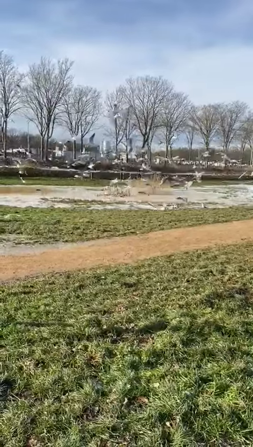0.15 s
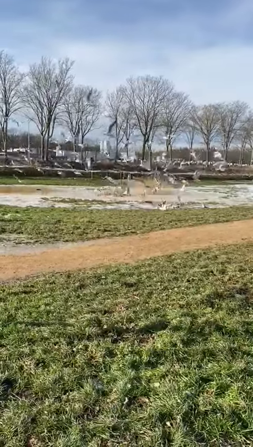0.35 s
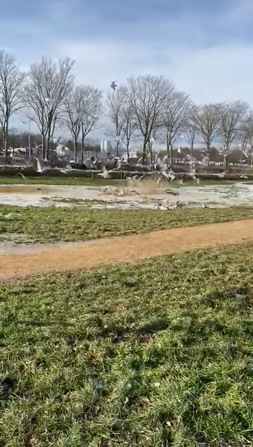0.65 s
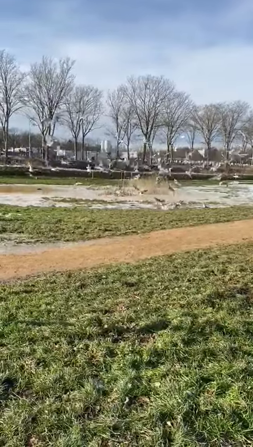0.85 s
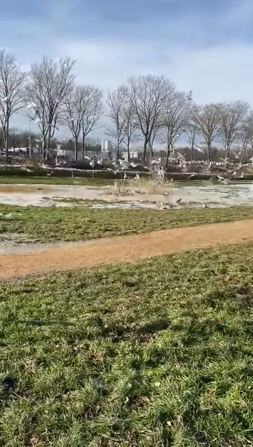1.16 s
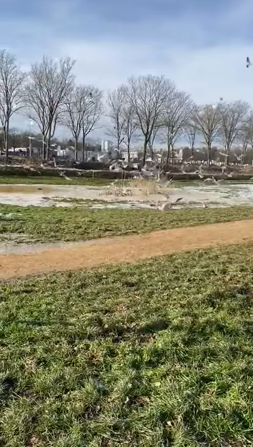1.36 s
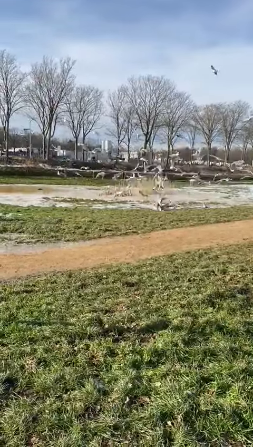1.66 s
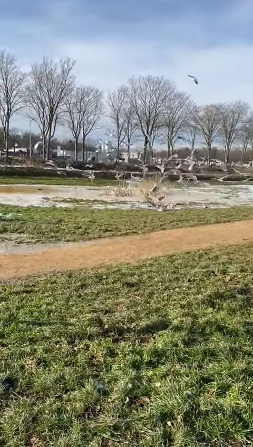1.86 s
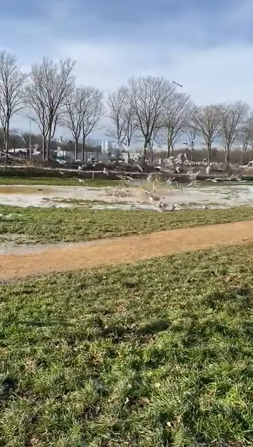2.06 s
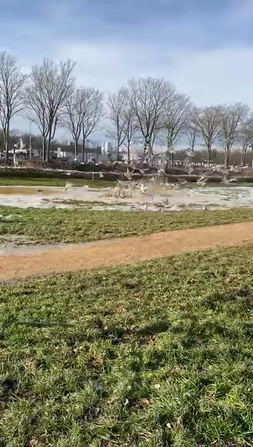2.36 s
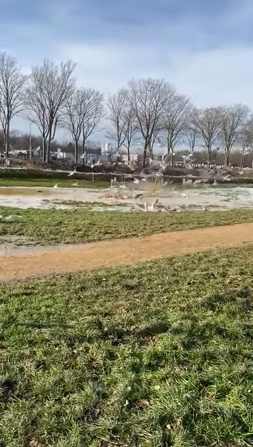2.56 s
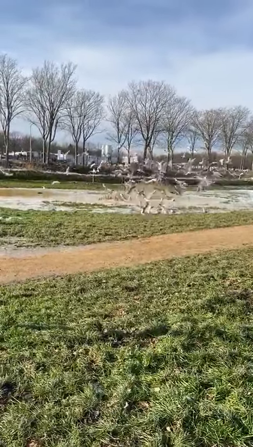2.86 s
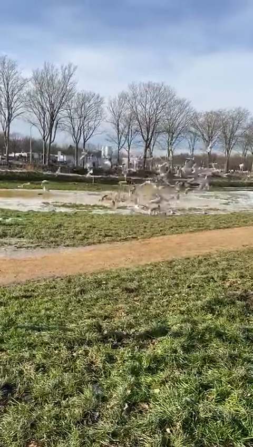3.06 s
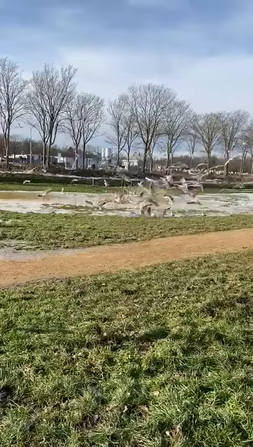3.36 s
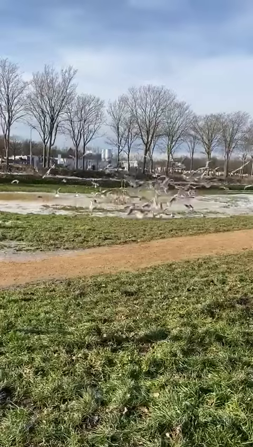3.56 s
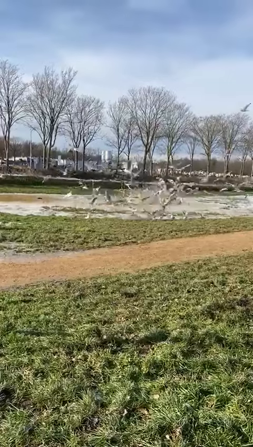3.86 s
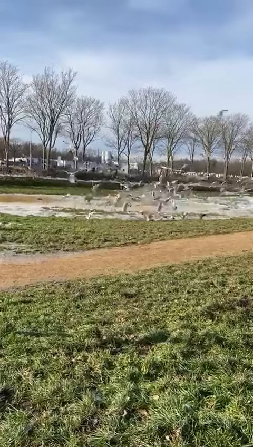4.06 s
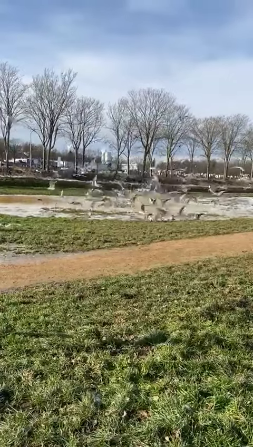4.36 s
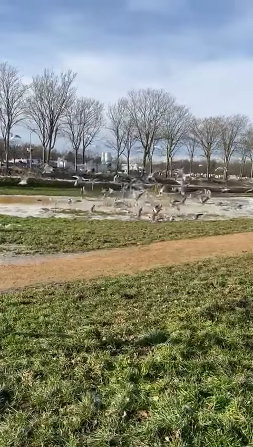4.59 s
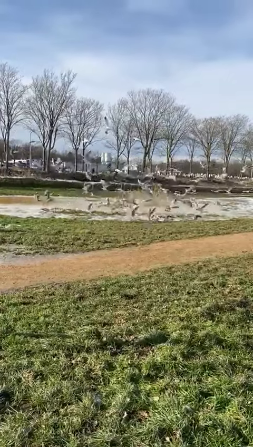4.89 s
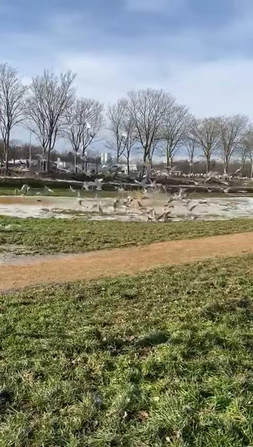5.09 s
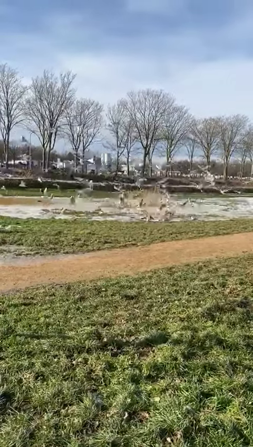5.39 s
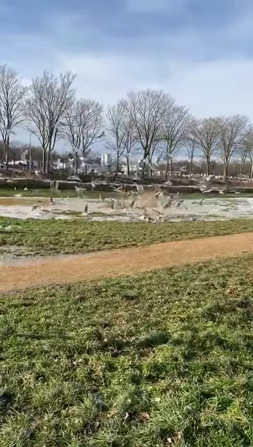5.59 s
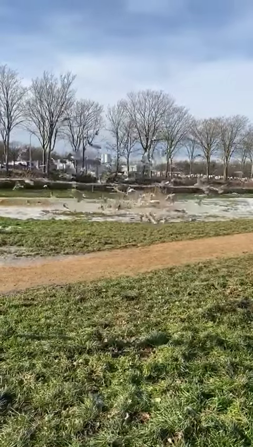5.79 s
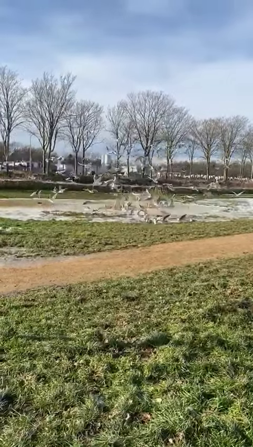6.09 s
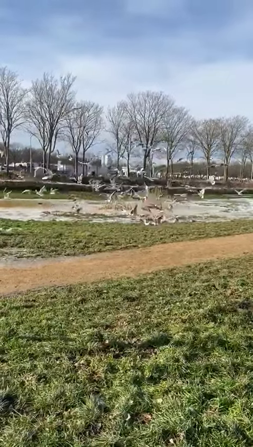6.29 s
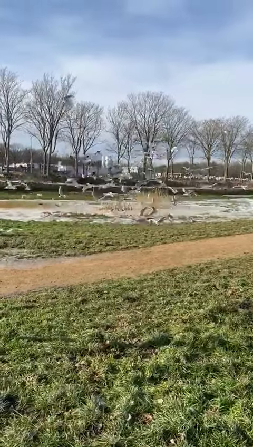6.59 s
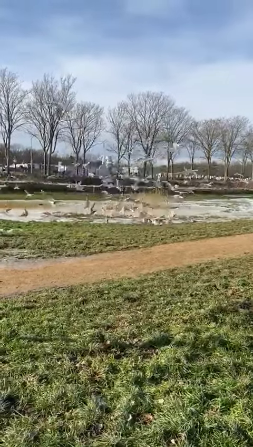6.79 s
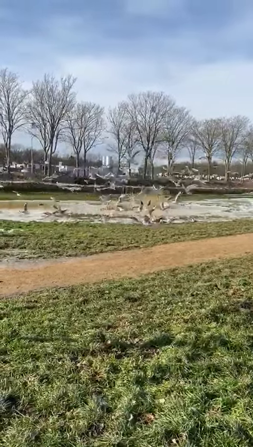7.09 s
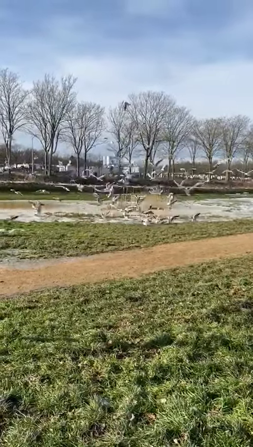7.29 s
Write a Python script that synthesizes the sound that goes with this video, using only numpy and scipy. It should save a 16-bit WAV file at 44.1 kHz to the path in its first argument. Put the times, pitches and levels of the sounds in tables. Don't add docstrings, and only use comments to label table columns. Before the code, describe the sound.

A large flock of gulls squabbles over a flooded open field, about forty metres from a hand-held stereo phone. From 0 to 2 s the cries are scattered and quieter after a brief far chorus at the start: short nasal yelps and rasps around 1 kHz, quickly throbbing, with light thumps on the case. From 2 s the flock grows louder; a knock near 2.5 s is firm. At 3.1 s two clear, steady calls stand out over a surge of distant birds. Between 3.4 and 6.4 s harsh overlapping cries are almost continuous, pitches sliding and clashing; the heaviest low thump lands at 3.75 s, with others until about 5.3 s. The clamour continues to 7.4 s, slightly looser, with faint final knocks after 7 s. Soft wind rumbles, distant traffic hisses, and a low engine hum rises weakly after 6.3 s. Echo is slight.

```python
import sys
import numpy as np
from scipy import signal
from scipy.fft import rfft, irfft
from scipy.io import wavfile
from scipy.ndimage import uniform_filter1d

SR = 44100
rng = np.random.default_rng(int(sys.argv[2]) if len(sys.argv) > 2 else 0)


def pcm_store(signal):
    levels = np.round(np.clip(np.atleast_2d(signal), -1, 1) * 32767)
    wavfile.write(sys.argv[1], SR, levels.astype(np.int16).T)


def attenuation_scalar(level_db):
    decades = np.asarray(level_db, float) / 20
    return 10 ** decades


N = 328104
TIME_S = np.arange(N) / SR


def shape(points, hz, column=1):
    table = np.array(points, float)
    return np.interp(np.log(np.maximum(hz, 1)), np.log(table[:, 0]), table[:, column])


def curve(points, column=1):
    table = np.array(points, float)
    return np.interp(TIME_S, table[:, 0], table[:, column])


def unit(x):
    return x / np.sqrt(np.mean(x ** 2) + 1e-18)


def walk(size, rate_hz):
    width = max(int(SR / rate_hz), 2)
    noise = rng.standard_normal(max(size, SR // 3), dtype=np.float32)[:size]
    return unit(uniform_filter1d(uniform_filter1d(noise, width), width))


def flicker(rate_hz):
    coarse = walk(N // 8, 8 * rate_hz)
    return np.interp(TIME_S, np.linspace(0, N / SR, N // 8), coarse)


def tinted(points):
    hz = np.fft.rfftfreq(N, 1 / SR)
    return unit(irfft(rfft(rng.standard_normal(N)) * attenuation_scalar(shape(points, hz)), N))


def partials(hz, colour, tilt_db=0, scatter_db=2):
    partial_hz = hz * np.arange(1, 13)
    weak_db = 13 * (partial_hz == hz)
    tilt = tilt_db * np.log2(partial_hz / 3500)
    return shape(colour, partial_hz) - weak_db + tilt + scatter_db * rng.standard_normal(12)


def voice(size, hz, throb_hz, harsh, partial_db, effort, glide=0, lead=0,
          arch=.05, bow=.07, wobble=.06, depth=1):
    beat = lead + np.cumsum(throb_hz * (1 + .15 * harsh * walk(size, 25))) / SR
    swell = np.sin(np.pi * beat) ** 2
    along = np.linspace(-1, 1, size)
    shake = harsh * (wobble * walk(size, 40) + .2 * harsh * walk(size, 900))
    pitch_hz = hz * (1 + glide * along + bow * (1 / 3 - along ** 2) + arch * (swell - .6) + shake)
    phase = np.float32(2 * np.pi * np.cumsum(pitch_hz) / SR)
    order = np.arange(1, len(partial_db) + 1, dtype=np.float32)[:, None]
    strength = np.float32(effort) ** (0.54 + 0.092 * order)
    stack = attenuation_scalar(partial_db) @ (strength * np.cos(order * phase))
    gate = 1 - depth * (1 - .25 * harsh) * (1 - np.tanh(2.4 * swell ** 2.2))
    return unit(stack * gate)


# start_s, length_s, pitch_hz, throb_hz, level_db
STEADY_CRIES = [
    (3.068, .08, 1095, 50, -32.5),
    (3.168, .105, 1090, 50, -30.5),
    (3.9, .04, 1060, 64, -37),
    (3.99, .03, 1075, 64, -36),
]
# start_s, length_s, pitch_hz, throb_hz, level_db
CLEAR_CRIES = [(0.194, 0.026, 958, 58, -42), (0.449, 0.057, 982, 83, -36.5),
               (0.704, 0.0064, 1060, 90, -49.5), (0.755, 0.062, 945, 62, -44.5),
               (0.914, 0.021, 1030, 60, -40.5), (2.157, 0.044, 955, 56, -43.5),
               (1.175, 0.032, 1180, 96, -43), (1.725, 0.02, 1024, 62, -43), (2.436, 0.1, 1010, 99, -31),
               (2.888, 0.033, 1022, 47, -33.5), (3.813, 0.081, 1044, 64, -36), (7.182, 0.1, 956, 51, -35),
               (7.256, 0.074, 1225, 61, -32.5), (7.381, 0.061, 982, 88, -40.5)]
# start_s, length_s, pitch_hz, throb_hz, level_db
RASPING_CRIES = [(0.111, 0.14, 1400, 110, -67), (1.017, 0.083, 823, 50, -57), (1.298, 0.092, 860, 62, -42),
                 (1.641, 0.046, 866, 34.5, -36.5), (1.77, 0.051, 1010, 96, -43.5),
                 (1.956, 0.062, 933, 55, -34), (2.221, 0.1, 992, 71, -34), (3.447, 0.066, 1023, 110, -33),
                 (3.496, 0.15, 1027, 45, -34.5), (3.701, 0.093, 1303, 58, -28),
                 (3.856, 0.15, 1040, 89, -34), (4.108, 0.12, 1047, 100, -32.5),
                 (4.814, 0.17, 1156, 64, -30), (5.219, 0.11, 1123, 65, -31.5),
                 (5.532, 0.19, 1188, 108, -31.5), (5.727, 0.16, 1024, 88, -31),
                 (5.912, 0.078, 783, 70, -44), (6.17, 0.115, 820, 61, -34), (2.842, 0.059, 1030, 60, -35),
                 (3.28, 0.11, 1040, 76, -33.5), (0.869, 0.071, 1000, 63, -54)]
# start_s, length_s, pitch_hz, level_db
SQUABBLE_CRIES = [(0.0, 0.053, 853, -54), (0.252, 0.092, 1040, -55.5), (0.613, 0.034, 1015, -54),
                  (1.211, 0.085, 877, -46.5), (1.45, 0.2, 985, -42), (1.861, 0.1, 1180, -38.5),
                  (2.074, 0.097, 882, -36), (2.312, 0.095, 917, -33.5), (2.516, 0.12, 1020, -41.5),
                  (2.632, 0.18, 1137, -34), (2.926, 0.15, 1176, -31.5), (3.973, 0.14, 1157, -32),
                  (4.204, 0.1, 1030, -31), (4.302, 0.17, 1116, -34.5), (4.487, 0.17, 959, -31.5),
                  (4.624, 0.081, 993, -33.5), (4.707, 0.12, 1128, -36.5), (5.005, 0.15, 1020, -34.5),
                  (5.346, 0.19, 907, -33.5), (5.994, 0.15, 992, -29), (6.362, 0.14, 945, -31),
                  (6.545, 0.14, 1042, -37), (6.682, 0.093, 1080, -37.5), (6.836, 0.17, 893, -37),
                  (7.039, 0.14, 882, -35.5), (0.041, 0.046, 975, -41.5), (2.39, 0.044, 1014, -48),
                  (2.784, 0.074, 1050, -42), (3.601, 0.11, 1050, -45), (5.159, 0.082, 1060, -42.5),
                  (6.491, 0.06, 1000, -46.5), (7.318, 0.044, 995, -47), (1.106, 0.059, 1050, -54),
                  (1.392, 0.16, 1010, -54), (2.022, 0.063, 985, -60), (3.38, 0.056, 1016, -49),
                  (4.444, 0.059, 1050, -38), (5.315, 0.053, 1000, -49), (6.989, 0.05, 967, -51)]
STEADY_HARSH, CLEAR_HARSH, RASP_HARSH, SQUABBLE_HARSH = .12, .27, .47, .75


def roster():
    steady = [(*cry, STEADY_HARSH) for cry in STEADY_CRIES]
    clear = [(*cry, CLEAR_HARSH) for cry in CLEAR_CRIES]
    rasps = [(*cry, RASP_HARSH) for cry in RASPING_CRIES]
    squabbles = [(s, length_s, hz, 70, db, SQUABBLE_HARSH) for s, length_s, hz, db in SQUABBLE_CRIES]
    return steady + clear + rasps + squabbles


# time_s, chorus_db, beak_tilt_db_per_octave
FLOCK_COURSE = [(0.0, -34, -7), (0.4, -49.5, 1.5), (0.9, -50.5, 1.5), (1.1, -47.5, 3.5), (2.1, -38.5, 2.5),
                (2.6, -34, 0.5), (3.0, -35.5, 0.5), (3.2, -27, -4), (3.35, -34, 0), (3.5, -33, 2),
                (5.7, -34.5, 1.5), (6.4, -34, 1.5), (7.44, -33.5, 0.5)]
# freq_hz, level_db
THROAT_COLOUR = [(800, 10.5), (1200, -2.5), (1800, 0), (2100, -13), (2600, 13), (3200, 6), (4300, 0.5),
                 (5400, -6.5), (6500, -14.5), (7600, -13.5), (8500, -19), (11300, -25.5)]
# freq_hz, level_db
STEADY_COLOUR = [(900, -6), (2200, 0), (3300, -7), (4400, 0), (5500, -6), (6600, -9), (7700, -14),
                 (8800, -20), (11300, -26)]


def cries(spill_s=.03, edge=.75, bow_s=.00719, join_db=-1):
    out = np.zeros(N + SR)
    tilt = curve(FLOCK_COURSE, column=2)
    for s, length_s, hz, throb_hz, db, harsh in roster():
        start = max(int((s - spill_s / 2) * SR), 0)
        size = int((length_s + spill_s) * SR)
        tilt_db = tilt[min(start + size // 2, N - 1)]
        effort = signal.windows.tukey(size, (edge * harsh + 0.48) * min(0.11 / length_s, 1))
        if harsh <= STEADY_HARSH:
            levels_db, bow = partials(hz, STEADY_COLOUR), .025
        else:
            levels_db = partials(hz, THROAT_COLOUR, tilt_db)
            bow = min(bow_s / (length_s + spill_s), .1)
        cry = voice(size, hz, throb_hz, harsh, levels_db, effort, bow=bow)
        # pitch_hz, throb_hz, glide, crest (0-1 of the cry)
        neighbours = rng.uniform([850, 45.5, -.1, .1], [1200, 120, .1, 0.84], size=(3, 4))
        for near_hz, near_throb_hz, glide, crest in neighbours:
            own = effort * np.exp(-((np.linspace(0, 1, size) - crest) / 0.5) ** 2)
            levels_db = partials(near_hz, THROAT_COLOUR, tilt_db, scatter_db=6)
            joined = voice(size, near_hz, near_throb_hz, .45, levels_db, own, glide)
            cry += harsh ** 1.5 * attenuation_scalar(join_db) * joined
        out[start:start + size] += attenuation_scalar(db - 1.0) * unit(cry)
    return out[:N]


# start_s, length_s, first_hz, last_hz, level_db
LIFTED_PARTIALS = [(0.0, 0.063, 1870, 1777, -41), (0.108, 0.12, 1367, 1725, -45.5),
                   (0.31, 0.025, 1617, 1710, -42), (0.458, 0.098, 1890, 1710, -42),
                   (0.74, 0.083, 1840, 1840, -43), (0.86, 0.056, 1560, 1774, -49),
                   (1.156, 0.1, 1194, 1697, -48), (1.305, 0.087, 1870, 1660, -46.5),
                   (1.574, 0.08, 1800, 1960, -42), (1.035, 0.065, 1510, 1860, -49),
                   (1.105, 0.05, 2055, 2360, -49), (1.516, 0.041, 1896, 2000, -47),
                   (2.0, 0.038, 1737, 1780, -40), (2.161, 0.22, 1914, 1960, -44.5),
                   (2.418, 0.12, 1925, 2065, -36.5), (3.92, 0.08, 1750, 1700, -42),
                   (2.948, 0.08, 2050, 1900, -38), (3.289, 0.14, 1783, 1720, -44.5),
                   (0.687, 0.028, 2140, 2080, -51), (3.596, 0.1, 1800, 1705, -41.5),
                   (5.6, 0.11, 1750, 1636, -47), (6.371, 0.097, 1950, 2030, -43),
                   (6.59, 0.067, 1950, 2140, -43), (6.18, 0.091, 1650, 1720, -46),
                   (3.45, 0.15, 1900, 2090, -36.5), (3.693, 0.1, 1912, 1820, -38),
                   (3.759, 0.18, 2137, 2020, -37), (4.009, 0.13, 2074, 1690, -35.5),
                   (4.179, 0.066, 2150, 2056, -36), (5.092, 0.15, 2200, 2014, -40.5),
                   (5.235, 0.079, 2053, 2450, -38), (5.415, 0.096, 1900, 1714, -37),
                   (5.729, 0.13, 1798, 2145, -35), (5.988, 0.18, 2120, 1760, -37),
                   (6.701, 0.052, 2133, 2110, -35), (6.872, 0.2, 1720, 1870, -43),
                   (0.181, 0.08, 2810, 3040, -39.5), (1.212, 0.043, 2660, 2620, -38),
                  (1.655, 0.032, 2700, 2830, -32), (1.986, 0.099, 2830, 2910, -50),
                  (3.501, 0.086, 3150, 3220, -33), (3.802, 0.027, 2200, 2400, -72),
                  (3.896, 0.072, 3055, 3130, -29), (3.978, 0.058, 3200, 3140, -32.5),
                  (4.119, 0.055, 3160, 3200, -38), (4.283, 0.074, 3080, 2970, -34),
                  (4.75, 0.046, 3130, 2920, -33), (5.043, 0.063, 2480, 2590, -32.5),
                  (5.636, 0.048, 3290, 2920, -33), (6.012, 0.069, 3090, 2620, -31),
                  (6.215, 0.085, 2270, 2593, -34.5), (6.248, 0.045, 2980, 3230, -34),
                  (6.428, 0.092, 2620, 2330, -39), (6.802, 0.075, 1290, 1840, -46),
                  (7.067, 0.086, 2350, 2830, -37), (7.122, 0.046, 3050, 3030, -34.5),
                  (7.228, 0.081, 2200, 2610, -41.5), (7.373, 0.074, 3070, 3140, -37),
                   (2.099, 0.071, 3480, 3440, -35.5), (2.6, 0.084, 3850, 3600, -38),
                 (2.4, 0.15, 4400, 2400, -35), (2.1, 0.07, 3600, 3400, -43), (4.19, 0.07, 3900, 4200, -41),
                 (3.452, 0.0386, 3600, 4350, -35.5), (4.83, 0.04, 3000, 4280, -38),
                 (0.757, 0.052, 4650, 5500, -49), (5.8, 0.031, 4250, 3000, -42),
                 (5.8, 0.07, 3900, 4300, -38.5), (2.5, 0.022, 5900, 7040, -41),
                 (3.6, 0.055, 7000, 6850, -51), (4.6, 0.097, 4500, 4410, -42), (7.2, 0.07, 4100, 4680, -39),
                 (6.036, 0.076, 4150, 3780, -44), (8, 0.1, 2700, 2800, -43),
                 (7.198, 0.068, 4000, 4010, -41), (8.3, 0.045, 3750, 3890, -38),
                 (0.465, 0.021, 4050, 3950, -40), (3.745, 0.055, 4200, 4250, -35),
                 (3.8, 0.085, 4200, 4330, -33), (3.6, 0.035, 4310, 4480, -34.5),
                 (6.7, 0.093, 4200, 3200, -33), (4.119, 0.066, 2100, 5200, -37),
                 (0.539, 0.077, 1780, 1600, -44.5), (4.722, 0.097, 3710, 4200, -38),
                 (4.863, 0.099, 3800, 4200, -33.5), (5.568, 0.0326, 4740, 6700, -37.5),
                 (5.613, 0.051, 3900, 5200, -37.5), (6.3, 0.044, 2900, 4190, -36),
                 (7.201, 0.14, 4300, 5170, -39)]


def strands(beak_db=12, harsh=.2):
    out = np.zeros(N + SR)
    nearer = roster()
    for s, length_s, first_hz, last_hz, db in LIFTED_PARTIALS:
        middle_s = s + length_s / 2
        parent = min(nearer, key=lambda cry: abs(cry[0] + cry[1] / 2 - middle_s))
        began_s, _, hz, throb_hz = parent[:4]
        start, size = max(int(s * SR), 0), int(length_s * SR)
        centre_hz = (first_hz + last_hz) / 2
        order = max(round(centre_hz / hz), 1)
        levels_db = partials(centre_hz / order, THROAT_COLOUR)
        levels_db[order - 1] = levels_db.max() + beak_db
        effort = signal.windows.tukey(size, .6)
        glide = (last_hz - first_hz) / centre_hz / 2
        lead = throb_hz * (s - began_s + 0.01503)
        strand = voice(size, centre_hz / order, throb_hz, harsh, levels_db, effort, glide, lead,
                       bow=.055, wobble=.07, depth=.75)
        out[start:start + size] += attenuation_scalar(db) * strand
    return out[:N]


# freq_hz, level_db
FAR_COLOUR = [(900, -26), (1400, -6), (1700, 0), (2100, -2), (2600, -9), (4200, -7), (5500, -13),
              (8500, -24), (11300, -29)]


def chorus(count=170, length_s=.13, blur_db=-5):
    out = np.zeros(N + SR)
    size = int(length_s * SR)
    draws = rng.uniform([0, 790, 46, 1.5, -.1], [1, 1200, 120, 2.2, 0.3], size=(count, 5))
    for place, hz, throb_hz, db, glide in draws:
        start = int(place * N)
        cry = voice(size, hz, throb_hz, .45, partials(hz, FAR_COLOUR), np.hanning(size), glide)
        out[start:start + size] += attenuation_scalar(db) * cry
    blend = unit(out[:N]) + attenuation_scalar(blur_db) * tinted(FAR_COLOUR)
    return attenuation_scalar(curve(FLOCK_COURSE) - 2.5) * blend


def answer(near, quick_s=.02, mood_s=.8, closeness=.49):
    quick = uniform_filter1d(near ** 2, int(quick_s * SR)) + 1e-9
    slow = uniform_filter1d(near ** 2, int(mood_s * SR)) + 1e-9
    return (quick / slow) ** (closeness / 2)


def field(x, ground_s=.0021, ground_db=-14, trees_db=-23, t60_s=.3):
    age_s = np.arange(SR // 2) / SR
    tail = rng.standard_normal(len(age_s)) * np.exp(-np.log(1000) * age_s / t60_s)
    response = attenuation_scalar(trees_db) * tail / np.sqrt(SR * t60_s / 14)
    response[0] += 1
    response[int(ground_s * SR)] += attenuation_scalar(ground_db)
    return signal.fftconvolve(x, response)[:N]


# start_s, peak_db
CASE_THUMPS = [(0.426, -21.5), (0.409, -30), (0.651, -20.5), (0.674, -28.5), (.704, -25), (.722, -25.5),
               (1.04, -27.5), (1.074, -25.5), (1.091, -27), (1.143, -29), (1.158, -30), (1.457, -17),
               (1.491, -22), (2.295, -16.5), (2.381, -19), (2.514, -13.5), (2.58, -24.5), (2.706, -16),
               (3.616, -20), (3.734, -15), (3.75, -8), (3.774, -13.5), (4.033, -16.5), (4.15, -21.5),
               (4.354, -15.5), (4.465, -20), (4.971, -22), (1.912, -25), (2.33, -21), (2.648, -29),
               (3.221, -29.5), (4.062, -21.5), (4.55, -24.5), (5.301, -24.5), (7.083, -23), (7.158, -21.5),
               (7.41, -30)]


def thumps(hz=300, t60_s=.086, fall_s=.0149, rest=.1):
    out = np.zeros(N + SR)
    age_s = np.arange(SR // 4) / SR
    sag = rest + (1 - rest) * np.exp(-age_s / fall_s)
    envelope = (1 - np.exp(-age_s / 0.0071)) * np.exp(-np.log(1000) * age_s / t60_s)
    for s, db in CASE_THUMPS:
        pitch_hz = hz * attenuation_scalar(0.327 * (db + 22.5)) * sag
        ring = np.sin(2 * np.pi * np.cumsum(pitch_hz) / SR) * envelope
        start = int(s * SR)
        out[start:start + len(age_s)] += attenuation_scalar(db - 5.0) * ring
    return out[:N]


# middle_s, length_s, level_db
WIND_GUSTS = [(0.446, 0.064, -37), (0.694, 0.1, -43), (1.084, 0.11, -41.5), (1.478, 0.038, -32.5),
              (1.967, 0.2, -43.5), (2.46, 0.34, -40), (2.7, 0.2, -41.5), (3.713, 0.19, -38.5),
              (4.292, 0.41, -38.5), (4.917, 1, -49.5), (7.194, 1, -42.5)]
# freq_hz, density_db_per_hz
WIND_COLOUR = [(12, -44), (20, -19), (48, 6), (97, 3.5), (270, -13.5), (380, -16), (505, -14), (621, -15),
               (700, -47), (910, -56), (1540, -120)]


def wind(calm_db=-50.5, gusty_db=4.5):
    power = np.full(N, attenuation_scalar(calm_db) ** 2)
    for middle_s, length_s, db in WIND_GUSTS:
        power += attenuation_scalar(db) ** 2 * np.exp(-(2 * (TIME_S - middle_s) / length_s) ** 2)
    lumps = attenuation_scalar(2 * gusty_db * np.tanh(flicker(48.0) / 2))
    return attenuation_scalar(2.5) * np.sqrt(power) * unit(tinted(WIND_COLOUR) * lumps)


# time_s, level_db
HUM_COURSE = [
    (0, -61),
    (6.25, -53),
    (6.36, -38),
    (6.5, -41.5),
    (6.75, -35.5),
    (6.9, -41.5),
    (7.05, -48.5),
    (7.44, -38.5),
]


def engine(hz=86.6):
    phase = 2 * np.pi * np.cumsum(hz * (1 + 0.011 * flicker(10.3))) / SR
    return np.sqrt(2) * attenuation_scalar(curve(HUM_COURSE) + 0.29 * flicker(12)) * np.sin(phase)


# time_s, level_db
ROAD_COURSE = [
    (0, -50),
    (.35, -51),
    (.9, -52.5),
    (1.6, -47.5),
    (5.4, -45.5),
    (5.9, -49.5),
    (7.44, -48.5),
]
# freq_hz, density_db_per_hz
ROAD_COLOUR = [(150, -1.5), (300, -3), (480, 0), (700, -0.5), (1000, -3), (1500, -1), (3000, -12),
               (6000, -26), (11500, -31)]


def traffic():
    level_db = curve(ROAD_COURSE) + 4.5 + 1.0 * flicker(63) + 1.38 * flicker(6.4)
    return attenuation_scalar(level_db) * tinted(ROAD_COLOUR)


# freq_hz, left_minus_right_db, lag_rad, likeness_0_1
PORT_MATCH = [(200, -1, 0, .92), (520, 1, -.2, .55), (1150, 3, 0, .87), (1950, -2, .1, .94),
              (2250, -3, .8, .8), (2500, -1, 2.1, .96), (2750, 1, 2.2, .97), (3200, 5, 1.9, .75),
              (3550, 9, 1, .1), (3750, 7, 0, .6), (4200, 4, 0, .85), (5000, 3, .4, .7), (5650, 5, 1.9, .7),
              (6500, 2, .1, .93), (6950, 0, 0, .995), (7400, 0, 0, .99), (7850, 1, -.8, .6),
              (8350, 0, -3.14, .99), (9600, 0, -3.14, .99), (10050, 0, -4.6, .5), (10500, 0, -6.28, .99)]
# time_s, long_lag_share_0_1
HAND_SWAY = [
    (0, .5),
    (.65, .9),
    (1.2, .5),
    (1.5, .9),
    (2.7, 1),
    (3.2, .6),
    (4.2, .5),
    (5, .2),
    (7.44, 0),
]


def ports(x):
    hz, wave = np.fft.rfftfreq(N, 1 / SR), rfft(x)
    shade = attenuation_scalar(-shape(PORT_MATCH, hz))
    lag_rad = shape(PORT_MATCH, hz, column=2)
    like = shape(PORT_MATCH, hz, column=3)
    sway = np.clip(curve(HAND_SWAY) + .25 * flicker(4), 0, 1)

    def delayed(stretch):
        turned = np.exp(-1j * lag_rad * np.where(lag_rad > 0, stretch, 1))
        return irfft(wave * shade * like * turned, N)

    right = (1 - sway) * delayed(.9) + sway * delayed(1.45)
    turn_rad = np.pi * flicker(5)
    for share in (np.cos(turn_rad), np.sin(turn_rad)):
        burst = rng.standard_normal(200) * np.hanning(200)
        scatter = np.exp(1j * np.angle(rfft(burst, N)))
        right += share * irfft(wave * shade * np.sqrt(1 - like ** 2) * scatter, N)
    return np.array([x, right])


def scene():
    near = cries() + strands()
    birds = field(near + answer(near) * chorus())
    return ports(birds + thumps() + wind() + engine() + traffic())


def band_limit(x):
    return signal.sosfilt(signal.butter(12, 12900, fs=SR, output="sos"), x)


def record(dry):
    bass_cut = signal.butter(2, 45, "high", fs=SR, output="sos")
    top_cut = signal.ellip(8, .3, 70, 11750, fs=SR, output="sos")
    mix = signal.sosfilt(bass_cut, dry)
    mix = np.tanh(3.5 * mix) / 3.5
    mix = signal.sosfilt(top_cut, mix)
    return band_limit(mix)


dry = scene()
out = record(dry)
pcm_store(out)
```